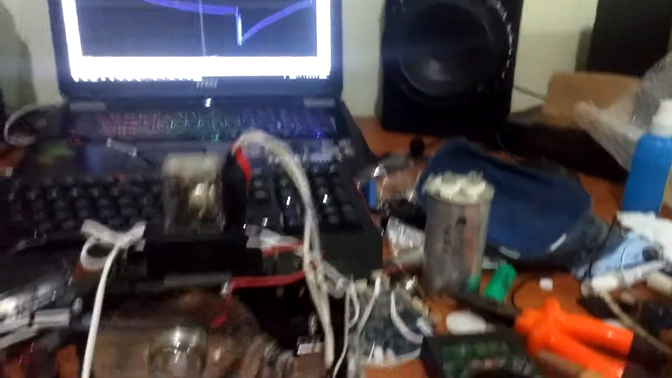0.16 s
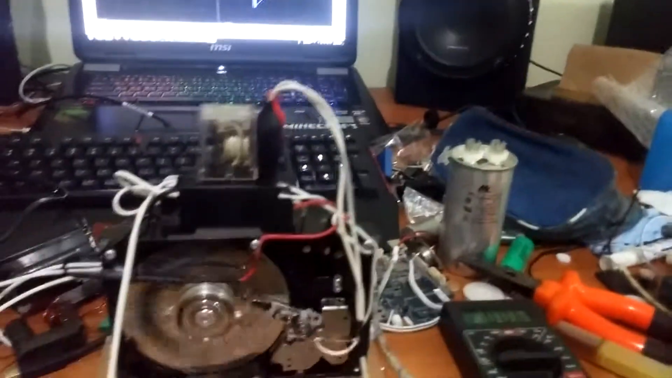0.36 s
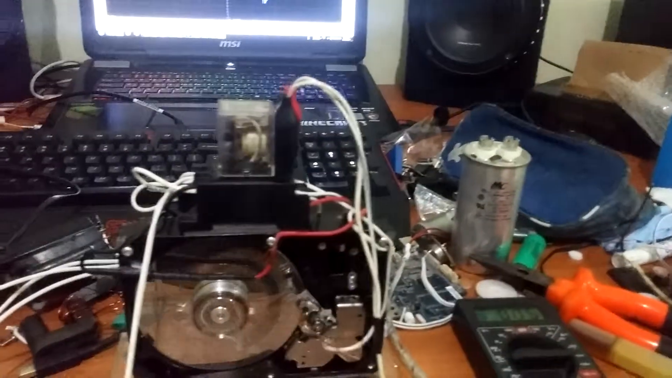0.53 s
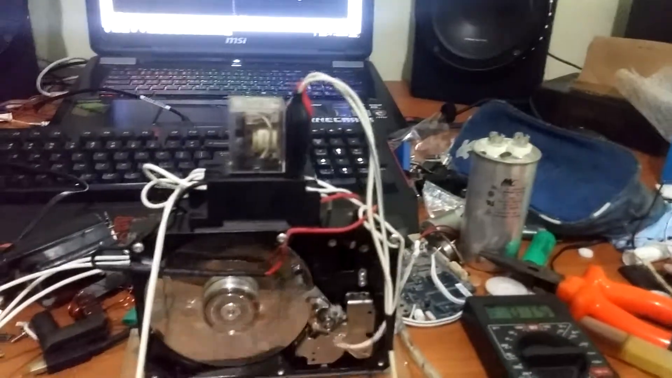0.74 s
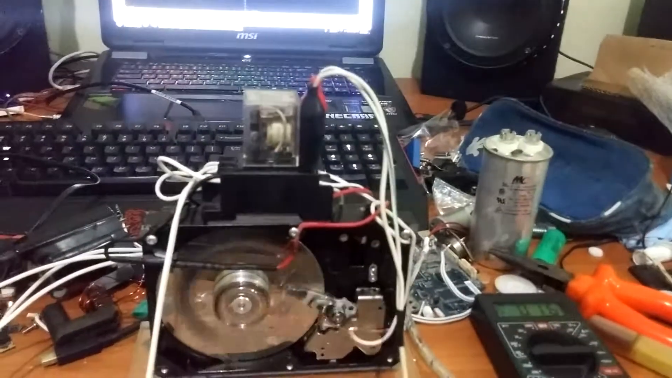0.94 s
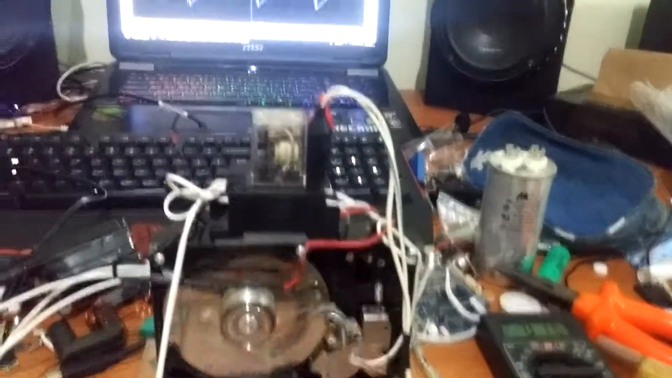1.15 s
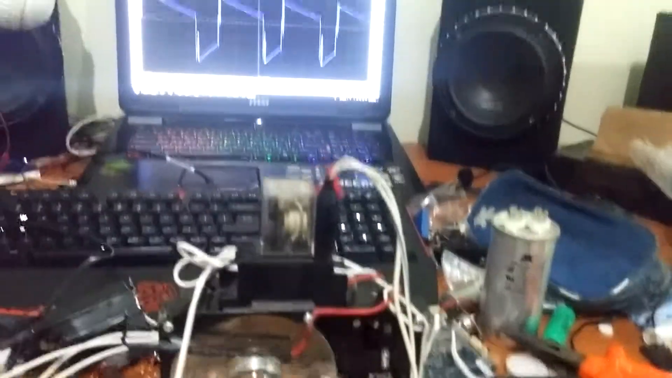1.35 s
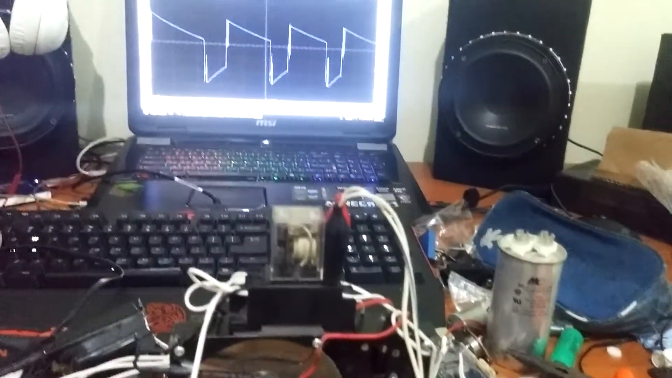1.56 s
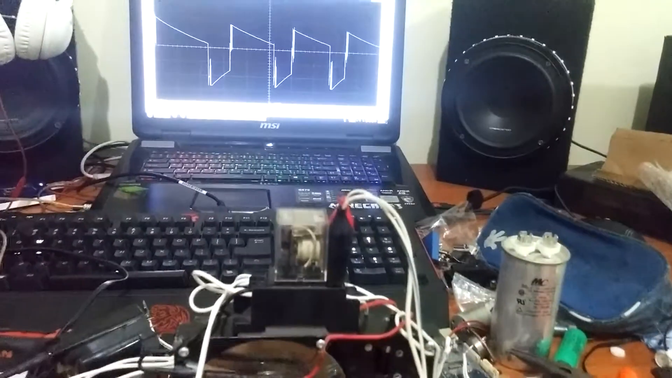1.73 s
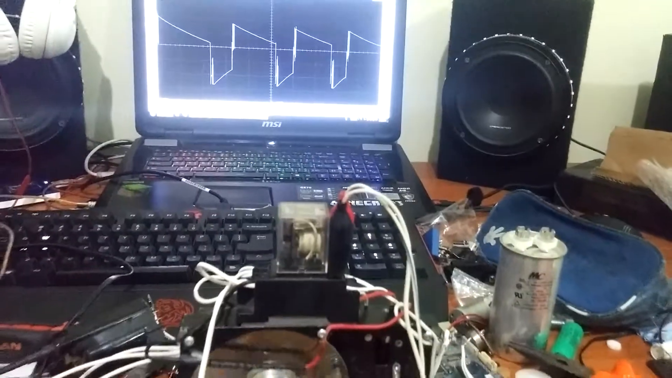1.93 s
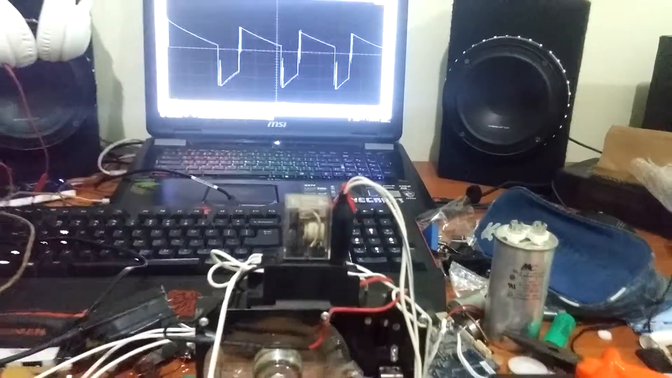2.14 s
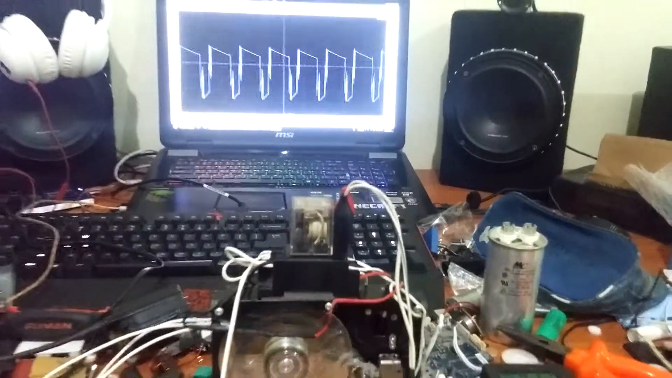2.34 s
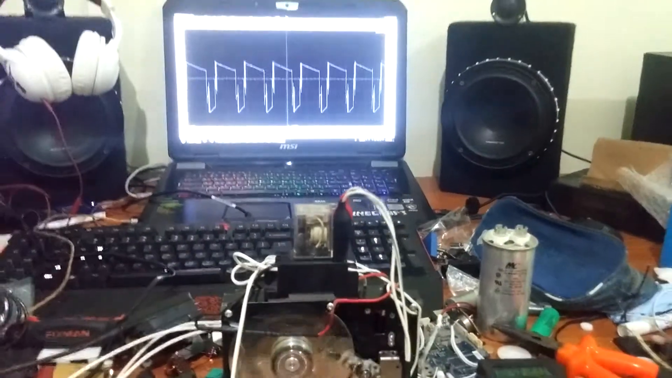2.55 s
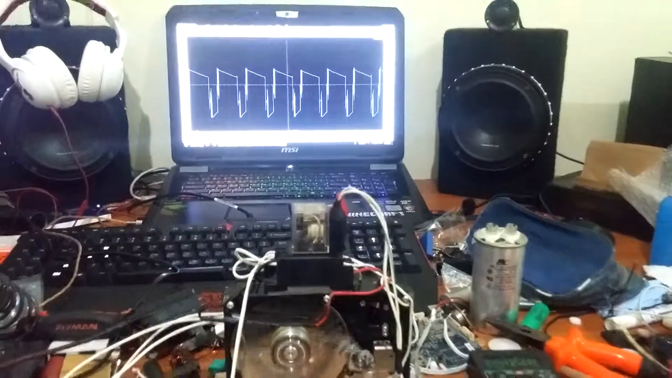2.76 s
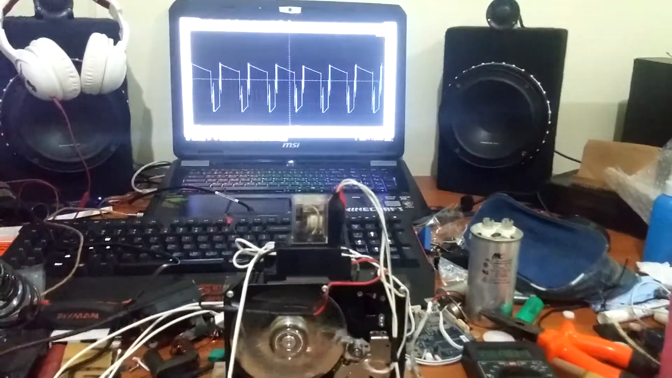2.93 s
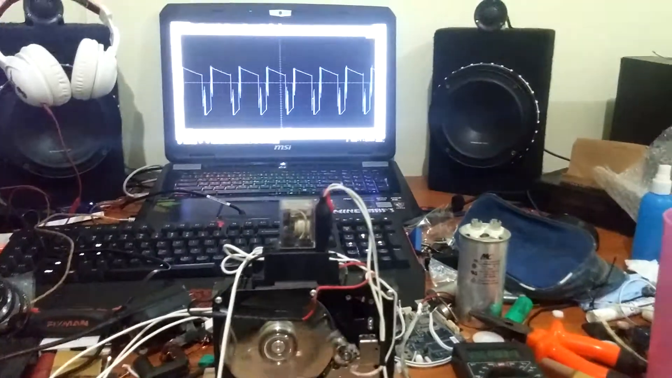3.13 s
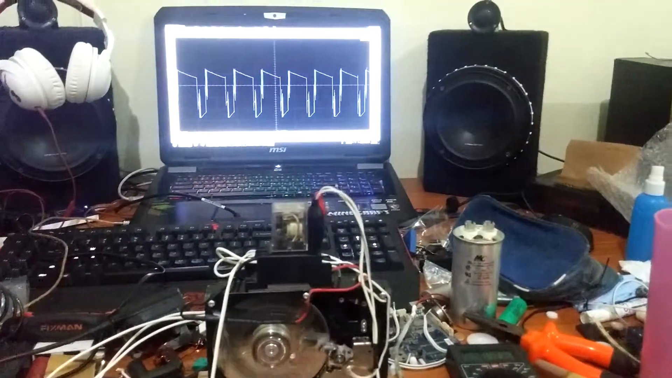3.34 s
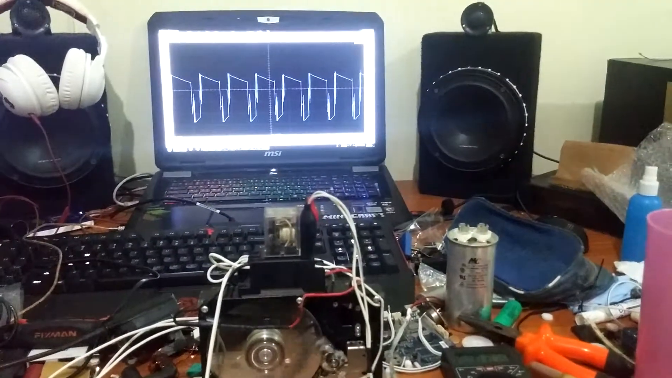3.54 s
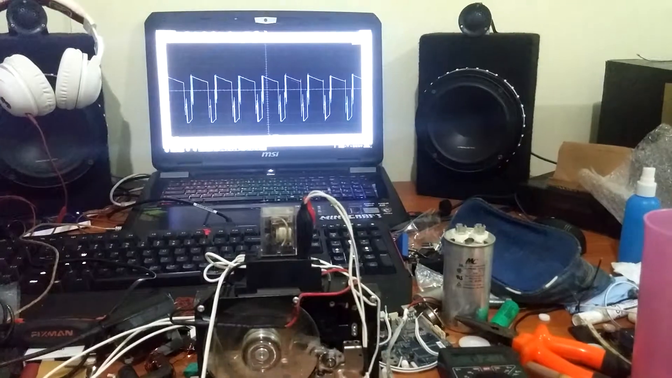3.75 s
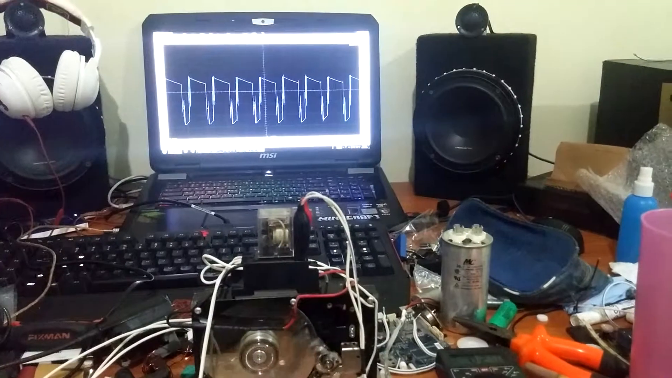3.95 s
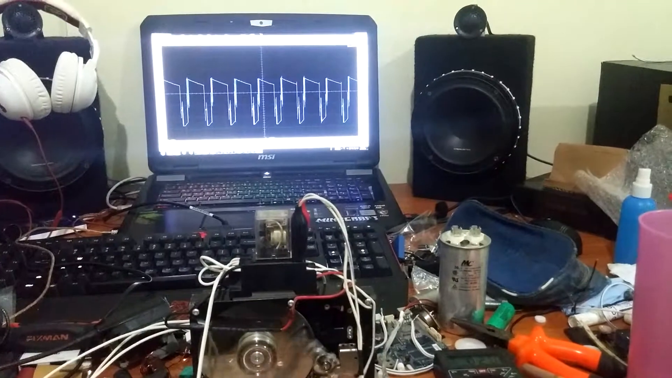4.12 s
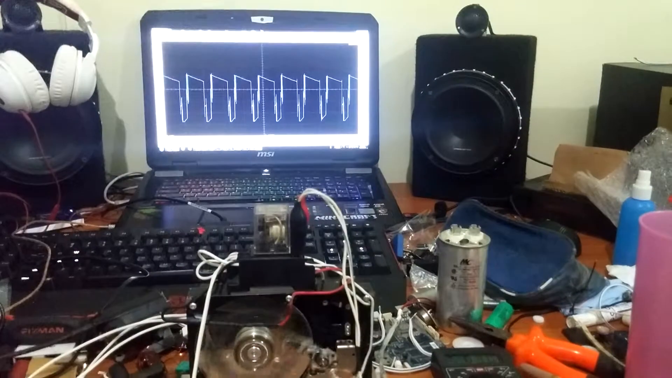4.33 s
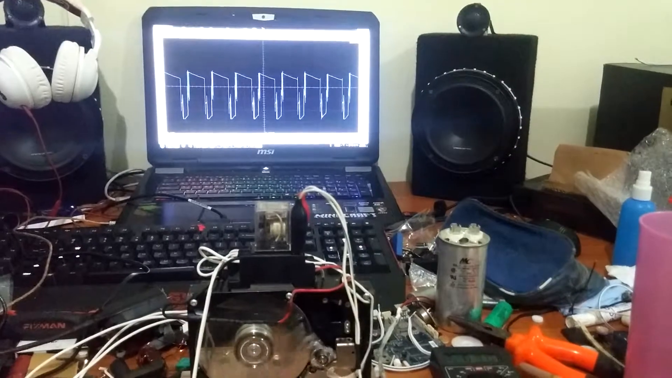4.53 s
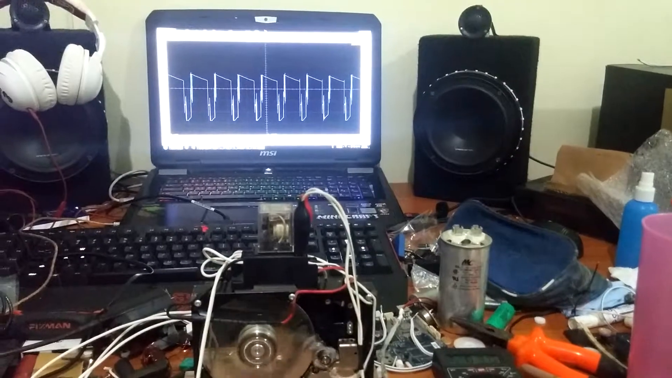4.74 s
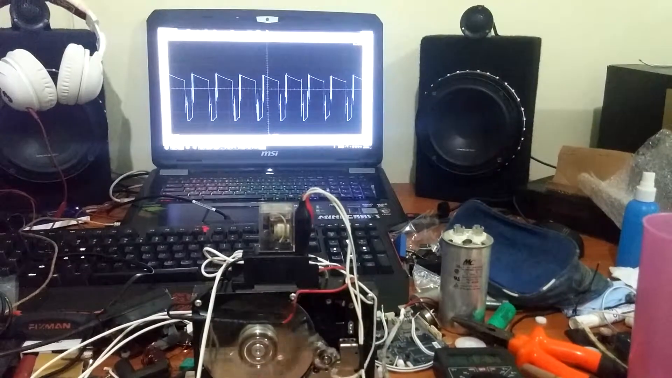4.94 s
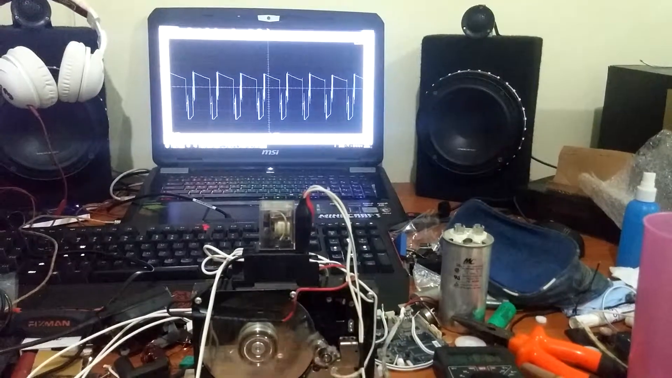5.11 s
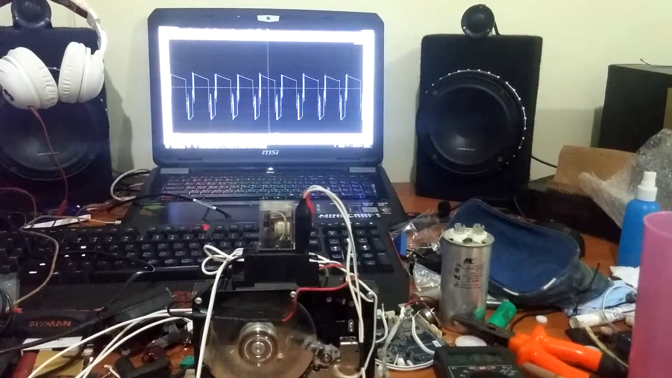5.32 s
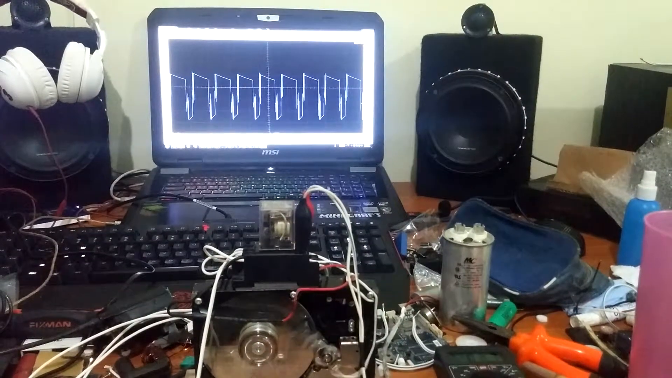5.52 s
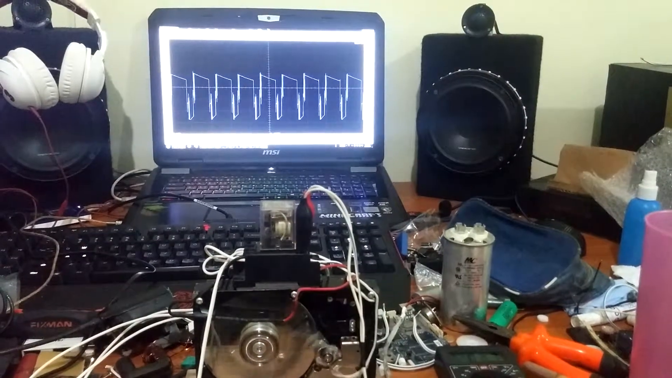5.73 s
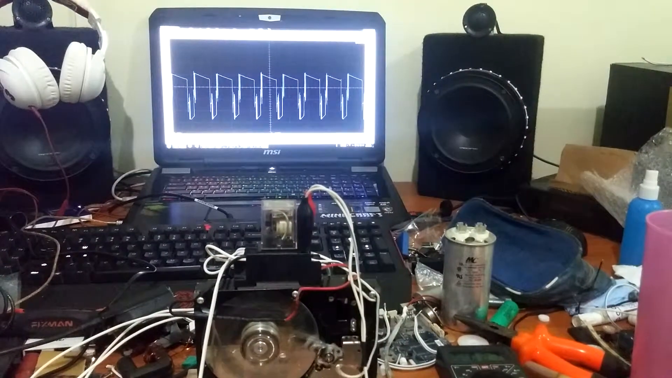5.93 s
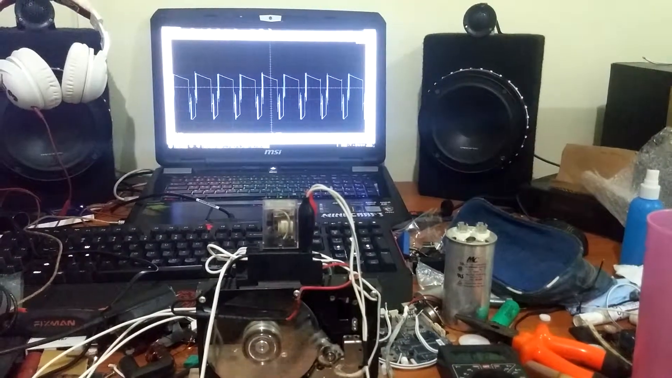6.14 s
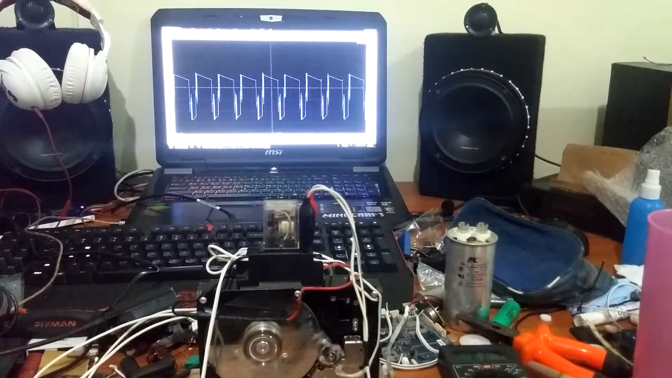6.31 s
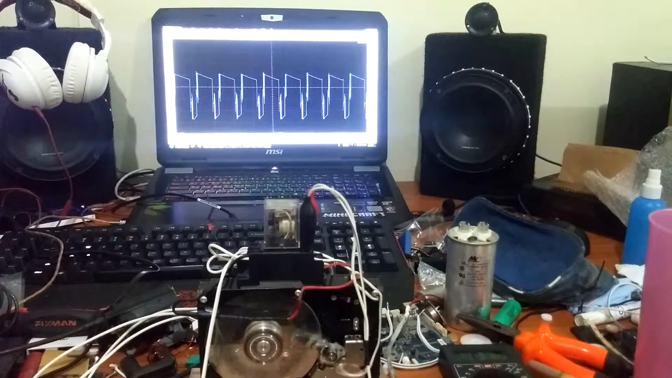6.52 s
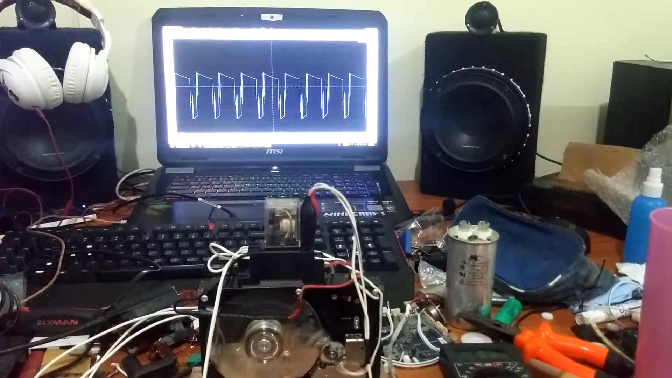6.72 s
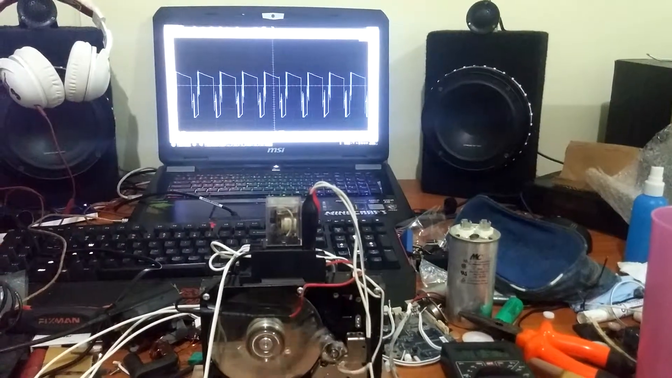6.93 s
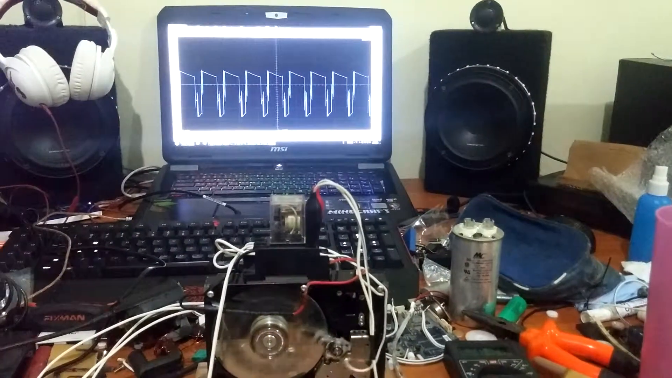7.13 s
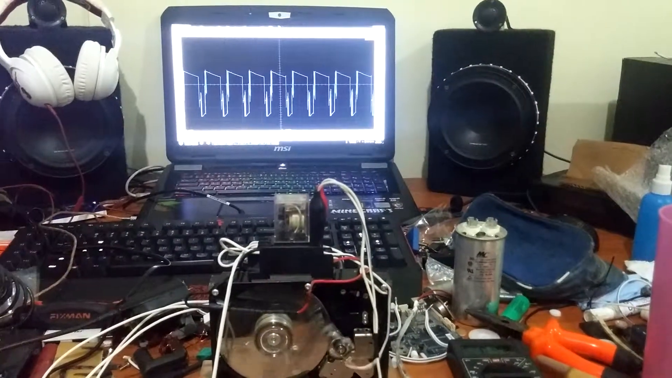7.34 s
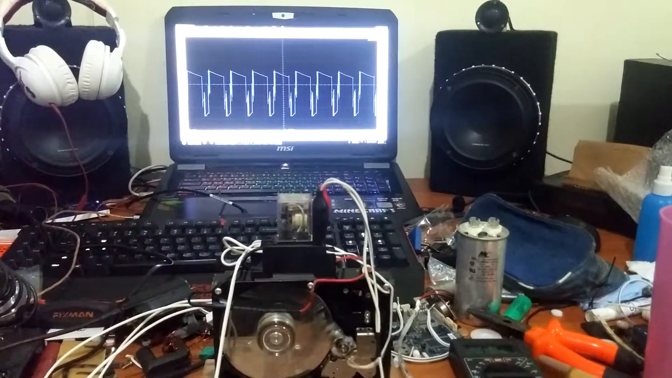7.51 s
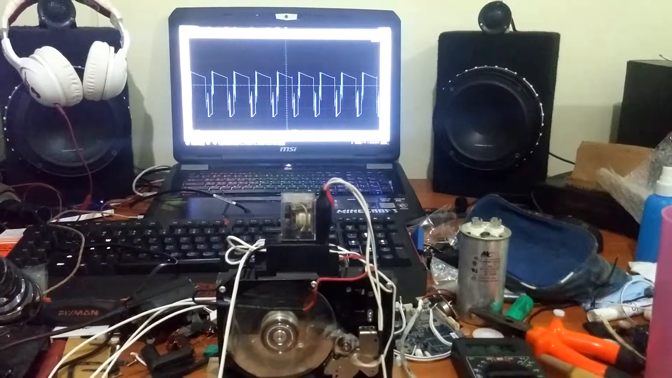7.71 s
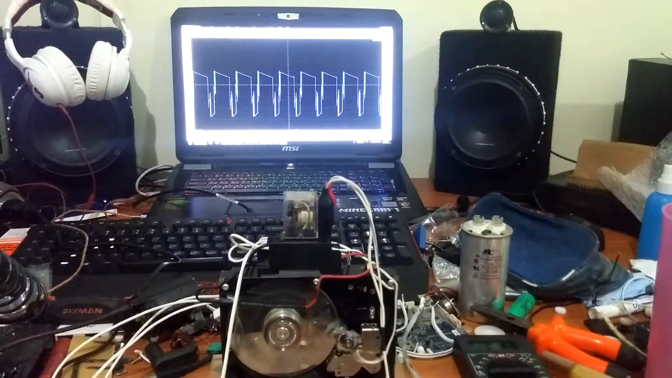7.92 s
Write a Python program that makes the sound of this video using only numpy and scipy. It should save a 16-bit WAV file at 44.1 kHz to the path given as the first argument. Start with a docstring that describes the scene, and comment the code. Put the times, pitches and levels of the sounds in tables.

```python
"""A relay clacks ever faster as a homemade pulse motor spins up, from 4.5 to nearly 18 turns a second.
The motor's magnets work the relay: each turn brings seven unlike clacks, each a noise burst with
bounces that knocks the case, rings the armature and snaps at the contacts.
The workbench drones in sines at multiples of the turning rate, one of which swells late on.
Behind lie a laptop fan of shaped noise, a faint hum, one brief hiss and a small room's echo."""
import sys
import numpy as np
from scipy import signal
from scipy.fft import rfft, irfft, next_fast_len
from scipy.io import wavfile
from scipy.ndimage import uniform_filter1d

SR = 44100
rng = np.random.default_rng(int(sys.argv[2]) if len(sys.argv) > 2 else 0)


def dump_mix(stems):
    """Bounce the given channels to the path in sys.argv[1] as a 16-bit WAV at rate SR."""
    frames = np.atleast_2d(stems).T  # one column per channel
    limited = np.clip(frames, -1, 1)  # hard clip at full scale
    pcm = np.round(limited * 32767).astype(np.int16)
    wavfile.write(sys.argv[1], SR, pcm)


N = 351477  # samples in the scene


def amp(db):
    """Decibel law: 20 dB is a tenfold amplitude."""
    return 10 ** (np.asarray(db) / 20)


def unit(x):
    """Power normalisation: x at rms 1."""
    return x / np.sqrt(np.mean(x ** 2) + 1e-20)


def along(points, hz):
    """Logarithmic frequency scale: (Hz, value) points joined by lines on a log axis."""
    point_hz, values = np.transpose(points)
    return np.interp(np.log(hz + 1), np.log(point_hz + 1), values)


def curves(rows):
    """Linear interpolation: one value per sample for each column after the time in seconds."""
    seconds, *columns = np.transpose(rows)
    return [np.interp(np.arange(N) / SR, seconds, column) for column in columns]


def wobble(rate, size=N):
    """Slow random fluctuation: rate knots a second, spanning the whole scene in size steps."""
    knots = rng.standard_normal(int(N * rate / SR) + 2)
    return np.interp(np.linspace(0, N * rate / SR, size), np.arange(len(knots)), knots)


def filtered(x, response):
    """Linear filtering: the spectrum of x times a response of frequency."""
    length = x.shape[-1]
    padded = next_fast_len(length + SR // 10, real=True)
    hz = np.fft.rfftfreq(padded, 1 / SR)
    return irfft(rfft(x, padded) * response(hz), padded)[..., :length]


def resound(x, gain_db, size=2048):
    """Minimum phase: x through a causal body whose gain in dB is a function of frequency."""
    cepstrum = irfft(np.log(amp(gain_db(np.fft.rfftfreq(size, 1 / SR)))))
    # folding the cepstrum onto positive times makes the body causal
    cepstrum[1:size // 2] *= 2
    cepstrum[size // 2 + 1:] = 0
    impulse = irfft(np.exp(rfft(cepstrum)))
    return signal.oaconvolve(x, impulse[None], axes=1)[:, :N]


# Interchannel correlation of diffuse sound.
# Each row: frequency in Hz, left-right correlation from -1 to 1.
CORRELATION = [(150, .98), (300, 0.8), (600, 0.7), (1300, 0.84), (3000, 0.38), (5500, -0.03), (8000, 0.05),
               (14000, 0)]


def paired(two):
    """Interchannel coherence: left and right much alike to about 1.3 kHz, unrelated in the high treble."""
    def mid_side(hz):
        turn = np.arccos(np.clip(along(CORRELATION, hz), -1, 1)) / 2
        return np.array([np.cos(turn), np.sin(turn)])

    mid, side = filtered(two, mid_side)
    return np.array([mid + side, mid - side])


def rush(spectrum):
    """Broadband turbulence: stereo noise of rms 1, shaped by (Hz, relative dB) points."""
    noise = paired(rng.standard_normal((2, N)))
    return unit(filtered(noise, lambda hz: amp(along(spectrum, hz))))


# Spectrum of the fan's air noise.
# Each row: frequency in Hz, relative density in dB.
FAN_SPECTRUM = [(25, -39), (60, -19), (100, -12), (175, 5.5), (290, 2), (380, 1.5), (520, -6), (800, -2.5),
                (1200, -6.5), (3000, -5), (5500, -13.5), (8000, -15), (15000, -27)]


def background(fan_db=-44, hum_db=-75, hum_hz=47):
    """Stationary noise and a pure tone: the laptop's fan and a faint low hum that wavers in level."""
    waver_db = 3 * wobble(2)
    tone = np.sqrt(2) * np.sin(2 * np.pi * hum_hz * np.arange(N) / SR)
    return amp(fan_db) * rush(FAN_SPECTRUM) + amp(hum_db + waver_db) * tone


def scuff(start=4.33, end=4.47, db=-36):
    """Gated noise: a brief dry hiss runs through the chatter, times in seconds."""
    gate, = curves([(start - .03, 0), (start + 0.026, 1), (end - .03, 1), (end + .02, 0)])
    hiss = rush([(40, -42), (400, -5), (1000, -5), (4000, -2), (8000, -3), (15000, -10)])
    return amp(db) * gate * hiss


# Reverberation of the small room.
# Each row: frequency in Hz, time to decay by 60 dB in seconds.
ROOM_DECAY = [(200, 0.043), (2000, 0.72), (6000, 0.5), (14000, 0.49)]


def room(x):
    """Reverberant decay: the walls answer 5 ms late; the bass dies first and the middle lasts longest."""
    noise = paired(rng.standard_normal((2, SR // 2)))
    hz, t, z = signal.stft(noise, SR, nperseg=256)
    decay = amp(-60 * t / along(ROOM_DECAY, hz)[:, None])
    tail = signal.istft(z * decay, SR, nperseg=256)[1]
    tail = np.pad(tail / np.linalg.norm(tail[0]), ((0, 0), (SR // 200, 0)))
    return signal.oaconvolve(x, tail, axes=1)[:, :N]


# The speed that the coil's push could sustain against friction.
# Each row: time in seconds, turning rate in turns per second.
DRIVE_SPEED = [(0, 17.716), (1, 18.386), (2, 17.917), (3, 18.339), (4, 18.211), (5, 17.804), (6.5, 17.635),
               (8, 17.89)]
START_TURNS, START_HZ = .079, 4.503  # the disc's first angle and turning rate
INERTIA_S = 1.4  # time constant of its lag behind the drive


def disc():
    """Rotational inertia: the heavy disc's turns done and turns per second lag behind the drive."""
    step = .001  # s
    s = np.arange(0, N / SR + step, step)
    pull = step / INERTIA_S
    excess = np.interp(s, *np.transpose(DRIVE_SPEED)) - START_HZ
    speed = START_HZ + signal.lfilter([pull], [1, pull - 1], excess)
    return curves(np.c_[s, START_TURNS + step * np.cumsum(speed), speed])


# Resonances of the bench.
# Each row: frequency in Hz, relative gain in dB.
BENCH_GAIN = [(100, -21.5), (142, -9), (165, -29), (185, 0.5), (210, -26.5), (231, 0), (255, -8),
              (284, 4.5), (315, -22), (355, -3.5), (410, -8.5), (445, -21), (480, -8), (550, -33),
              (640, -6.5), (800, -47)]
# Multiples of the turning rate that are driven harder.
# Each entry: the multiple as key, extra level in dB as value.
EXTRA_ORDERS = {20: 6, 22: 4, 23: 6, 27: 2, 35: 6, 39: 5}
DRONE_DB, DRONE_GROWTH_DB = -45.5, 0.52  # level at the final speed, and gain per turn/s
BOOM_ORDER = 13  # the multiple that boom() plays instead


def bench(angle, speed, waver_db=2, drift_turns=0.034, count=42):
    """Order excitation: multiples of the turning rate glide through resonances, each wavering alone."""
    level_db = DRONE_DB + DRONE_GROWTH_DB * (speed - speed[-1])
    angle, speed = angle[::10], speed[::10]  # low tones need only a coarse time grid
    drone = np.zeros(len(angle))
    for k in range(6, count):
        if k == BOOM_ORDER:
            continue
        gain_db = along(BENCH_GAIN, k * speed) + EXTRA_ORDERS.get(k, 0)
        gain_db = gain_db + waver_db * wobble(5, size=len(angle))
        phase_turns = k * angle + rng.random() + drift_turns * wobble(5, size=len(angle))
        drone += amp(gain_db) * np.sin(2 * np.pi * phase_turns)
    return amp(level_db) * unit(signal.resample_poly(drone, 10, 1)[:N])


# Level of the swelling boom near 230 Hz.
# Each row: time in seconds, level in dB when exactly in tune, before the trim of boom().
BOOM_LEVEL = [(3.75, -45.5), (4.13, -80), (4.23, -45), (4.63, -46.5), (4.65, -60), (4.77, -46),
              (5.51, -45.5), (5.64, -53), (5.82, -43), (6.15, -51), (6.71, -41.5), (6.98, -52), (7.8, -43),
              (7.97, -51)]


def boom(angle, speed, resonance_hz=230, half_width_hz=8, trim_db=0.3):
    """Resonance: one multiple of the turning rate settles near the resonance, then swells and fades."""
    detuning = (BOOM_ORDER * speed - resonance_hz) / half_width_hz
    in_tune = 1 / np.hypot(1, detuning ** 2)
    tone = np.sqrt(2) * np.sin(2 * np.pi * BOOM_ORDER * angle)
    return amp(curves(BOOM_LEVEL)[0] + trim_db) * in_tune * tone


def clacks(done, angle, lag, slow_db, bounce, jitter=.00036, spread_db=1.0, bounce_time=.0013, count=4):
    """Impact and rebound: one blow a turn, each followed by a few uneven bounces (times in seconds)."""
    s, turn = np.arange(N) / SR, np.arange(int(done[-1]) + 1)
    period = np.diff(np.interp(turn, done, s))
    slowness = np.clip(np.r_[period - period[-1], 0] / 0.072, 0, 1) ** 1.23
    chance = rng.standard_normal((len(turn), 2))
    times = np.interp(turn + angle, done, s, left=-1, right=-1) + lag + jitter * chance[:, 0]
    sizes = amp(slow_db * slowness + spread_db * chance[:, 1])
    gaps = bounce_time * rng.uniform(.3, 1.7, (len(turn), count))
    rebounds = bounce * rng.standard_normal((len(turn), count)) * 0.82 ** np.arange(count)
    times = np.c_[times, times[:, None] + np.cumsum(gaps, axis=1)]
    # a blow and its bounces share one energy
    shares = np.c_[np.ones(len(turn)), rebounds]
    sizes = sizes[:, None] * shares / np.linalg.norm(shares, axis=1, keepdims=True)
    heard = times > 0
    return np.bincount((times[heard] * SR).astype(int), sizes[heard], N)[:N]


def scatter(t60, rise, size=2048, order=10):
    """Dense reflection: the evenly coloured burst of one clack inside the relay and among the clutter."""
    t = np.arange(size) / SR
    envelope = amp(-60 * t / t60) * (1 - np.exp(-t / rise))
    z = rfft(paired(rng.standard_normal((2, size))) * envelope)
    # dividing by the smoothed spectrum evens out the colour
    even = z / np.sqrt(uniform_filter1d(np.abs(z) ** 2, order, axis=1))
    return irfft(even)[:, :size * 3 // 4]


def pings(struck, modes, width_hz=170, vary_db=4.5):
    """Modal vibration: the blows wake narrow steel modes, whose strengths wander independently."""
    ringing = np.zeros_like(struck)
    for hz in modes:
        b, a = signal.iirpeak(hz, hz / width_hz, fs=SR)
        ringing += signal.lfilter(b, a, struck * amp(vary_db * wobble(16)))
    return ringing


FIRM_HZ = 12  # turning rate from which the relay closes with full force
FLARE_HZ, FLARE_WIDTH_HZ = 14.8, 1.06  # turning rate at the flare's centre, and its spread


def force(speed, full_db, weak_db, slope_db, flare_db, unsteady_db):
    """Speed-dependent excitation: level in dB of one part, weak while slow and altered at the flare."""
    drop = np.where(speed < FIRM_HZ, weak_db + slope_db * (FIRM_HZ - speed), 0)
    flare = flare_db * np.exp(-((speed - FLARE_HZ) / FLARE_WIDTH_HZ) ** 2)
    return full_db - drop + flare + unsteady_db * wobble(14)


# When each clack of a turn falls.
# Each row: disc angle in turns, travel time of the moving part in seconds.
CLACK_TIMING = [(.01, .0004), (.083, 0), (.158, 0), (.247, .0054), (.28, .0083), (.527, .0078), (.86, 0)]
# How each clack sounds. Each row: relative knock, ring and spark in dB, change when slow in dB,
# bounce size as a share of the blow, build-up in seconds, mode level in dB, three modes in Hz.
CLACK_SOUND = [(-4, -11.5, -7, 0, 0.28, 0.00041, 6, 1530, 5350, 5000),
               (0.5, -3.5, 5, -8, 0.42, 0.00032, 4, 1380, 5100, 5450),
               (2, 1.5, -9, -3.5, 0.54, 0.00064, 2.5, 2100, 2498, 4610),
               (-9, -2, -4, 2.5, 0.87, 0.0005, 1, 2810, 3310, 4780),
               (2.5, 0.5, 1, -6, 0.8, 0.0013, -1.5, 2710, 3130, 3990),
               (-7.5, -3, -5, 1.5, 0.5, .0024, 2, 2940, 3660, 4100),
               (-6.5, -9, -8, -29, 0.76, 0.0041, -19, 1150, 2800, 6100)]
# Colours of the relay's steel armature, case and contacts.
# Each row: frequency in Hz, relative gain in dB.
ARMATURE_GAIN = [(60, -34.5), (600, -19), (1500, -15), (1900, -12.5), (2300, -8.5), (2750, -2.2),
                 (3250, -5.5), (3650, 2.5), (4000, -3), (4500, -1), (4950, -5), (5400, 0.5), (5800, -10),
                 (6300, -7), (7000, -22)]
CASE_GAIN = [(50, -67), (200, -44.5), (450, -21), (860, -20.5), (1000, -3), (1170, 3), (1310, 0),
             (1520, -9), (1830, 1.5), (2060, -1), (2300, -22.5), (3500, -31)]
CONTACT_GAIN = [(3000, -25), (6000, 6), (7400, 5.5), (8400, 1.5), (9400, 5), (10300, 0.5), (11500, 6),
                (13300, 1.5), (14400, -3.5), (15600, -11)]
# Level against speed, with one row each for armature, case and contacts.
# Each row: full level in dB before the relay's trim, drop below the firm rate in dB,
# further drop in dB per turn/s, flare in dB, unsteadiness in dB.
PART_LEVELS = [(-27.5, 1.1, 1.1, 2, 0.6), (-33.5, 1.5, 0.43, -0.7, 0.66), (-38, 2, 0.5, 4, 1)]


def relay(done, speed):
    """Source and resonator: every clack knocks the case, rings the armature and snaps at the contacts."""
    knock, ring, spark = np.zeros((3, 2, N))
    for (angle, lag), row in zip(CLACK_TIMING, CLACK_SOUND):
        knock_db, ring_db, spark_db, slow_db, bounce, rise, mode_db, *modes = row
        blows = clacks(done, angle, lag, slow_db, bounce)[None]
        struck = signal.oaconvolve(blows, scatter(t60=.019, rise=rise), axes=1)[:, :N]
        snapped = signal.oaconvolve(blows, scatter(t60=0.044, rise=0.0001), axes=1)[:, :N]
        knock += amp(knock_db) * struck
        ring += amp(ring_db) * (struck + amp(mode_db) * pings(struck, modes))
        spark += amp(spark_db) * snapped
    chatter = np.zeros((2, N))
    bodies = (ARMATURE_GAIN, CASE_GAIN, CONTACT_GAIN)
    for x, body, levels in zip((ring, knock, spark), bodies, PART_LEVELS):
        voiced = resound(x, lambda hz: along(body, hz))
        # the same power shared among fewer clacks makes each one larger
        chatter += amp(force(speed, *levels)) * unit(voiced / np.sqrt(speed))
    return chatter


# Stereo balance of the relay and its echo.
# Each row: frequency in Hz, left minus right in dB.
BALANCE = [(300, 7), (700, -1), (1200, -3), (1750, -9), (2700, -7), (3700, -11.5), (4600, -6), (6300, -8),
           (7500, -3.5), (11000, -3.5), (13200, 1.5), (15500, 9)]


def scene(relay_db=-1, room_db=-9):
    """Superposition: the relay, right in most bands but left in bass and top treble, over the rest."""
    angle, speed = disc()
    near = amp(relay_db) * relay(angle, speed)
    echoed = near + amp(room_db) * room(near)
    chatter = filtered(echoed, lambda hz: amp(np.outer([.5, -.5], along(BALANCE, hz))))
    return chatter + bench(angle, speed) + boom(angle, speed) + scuff() + background()


TOP_HZ = 15900  # band limit


def record(dry):
    """Band limitation: the phone keeps nothing above its band limit."""
    return filtered(dry, lambda hz: hz < TOP_HZ)


dry = scene()
out = record(dry)
dump_mix(out)
```